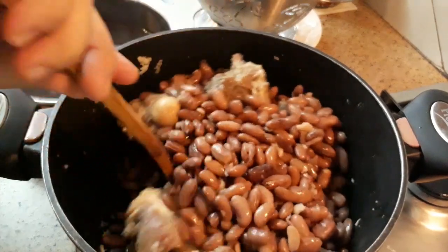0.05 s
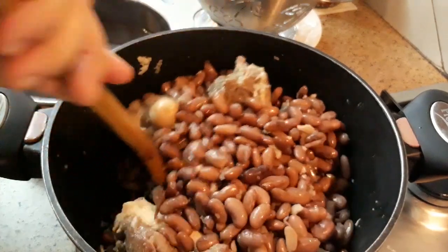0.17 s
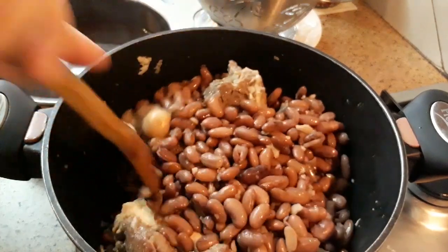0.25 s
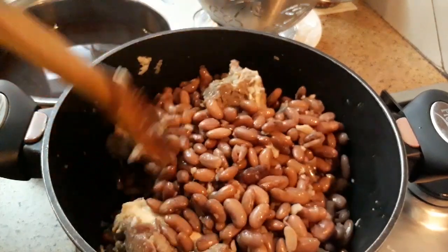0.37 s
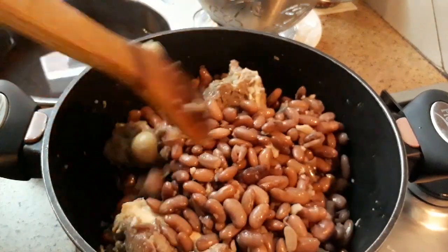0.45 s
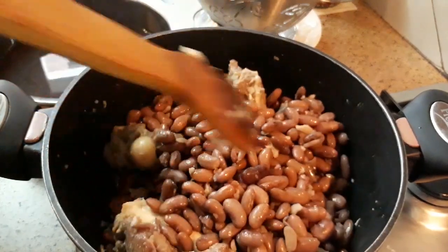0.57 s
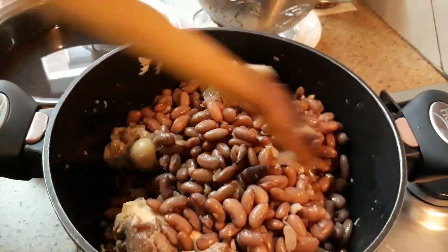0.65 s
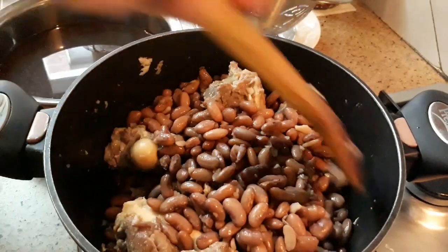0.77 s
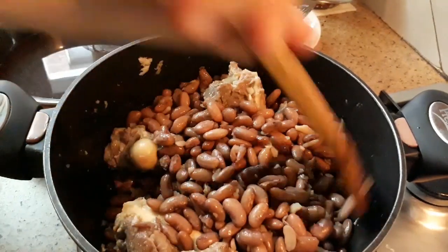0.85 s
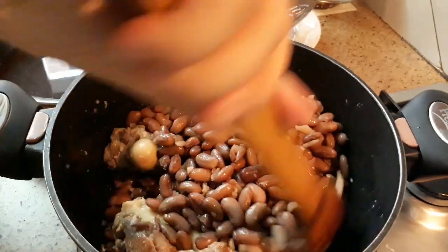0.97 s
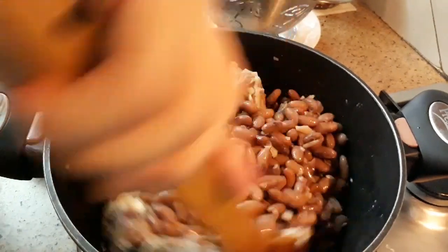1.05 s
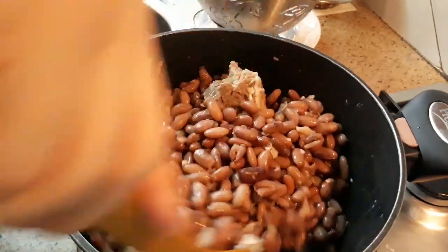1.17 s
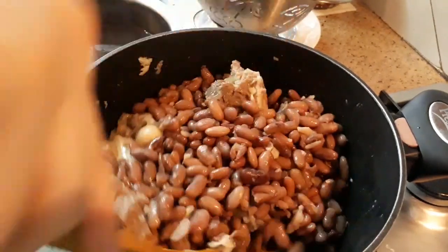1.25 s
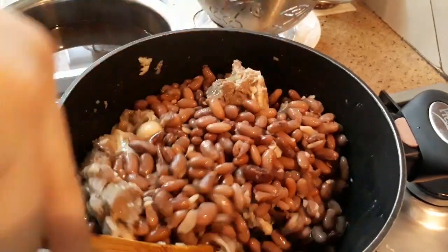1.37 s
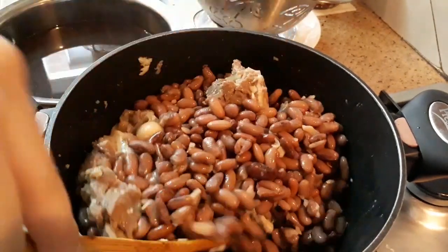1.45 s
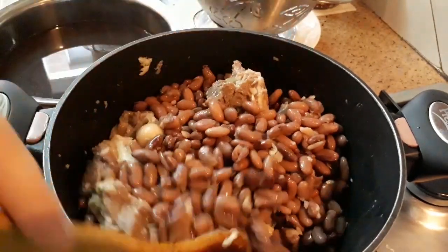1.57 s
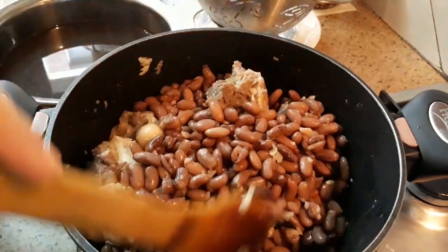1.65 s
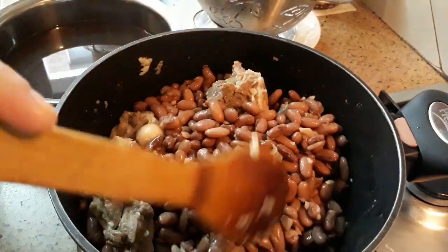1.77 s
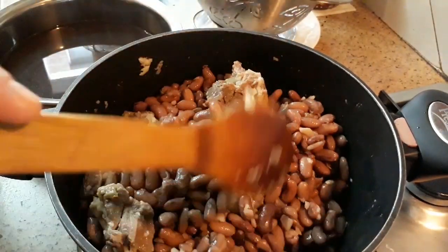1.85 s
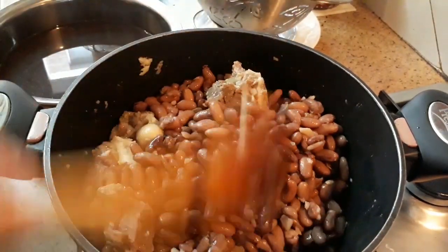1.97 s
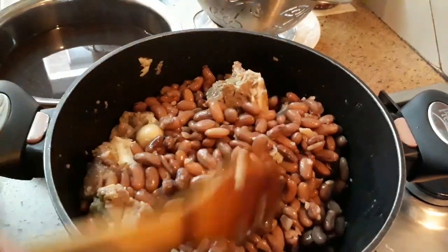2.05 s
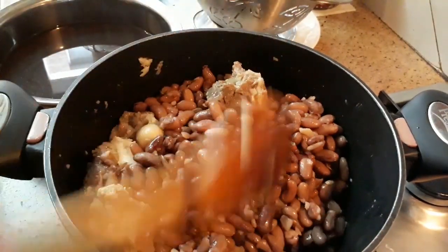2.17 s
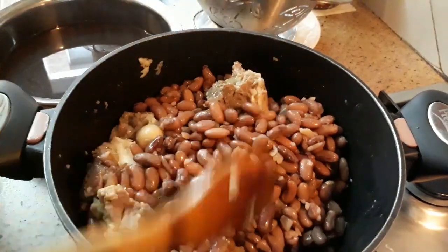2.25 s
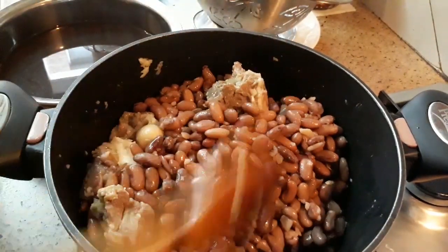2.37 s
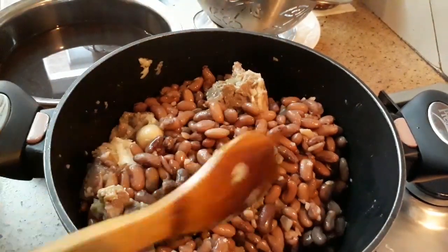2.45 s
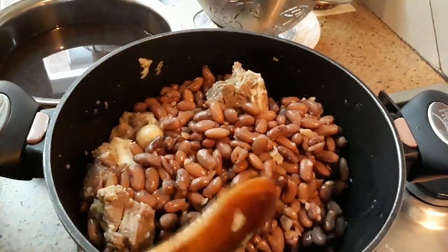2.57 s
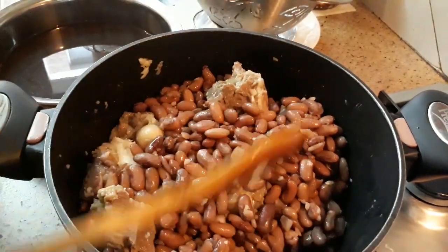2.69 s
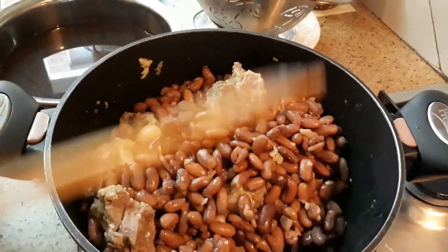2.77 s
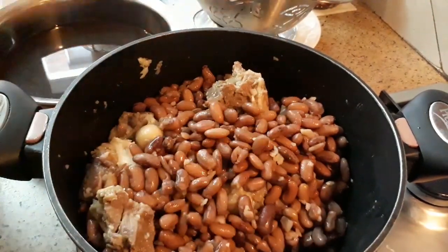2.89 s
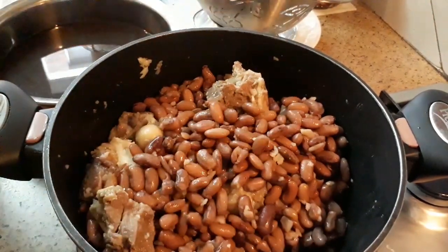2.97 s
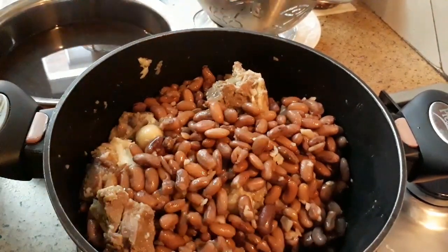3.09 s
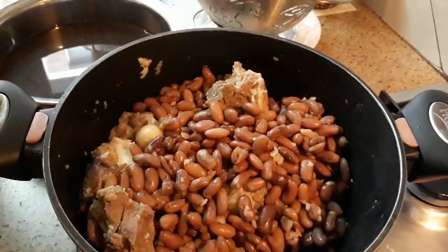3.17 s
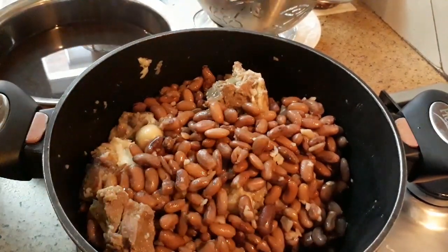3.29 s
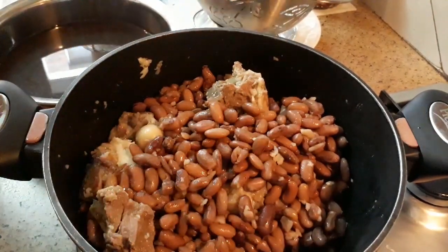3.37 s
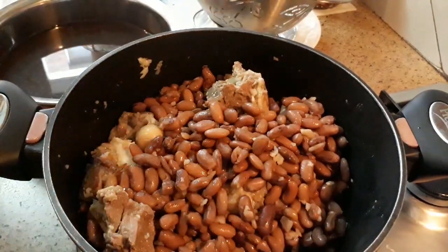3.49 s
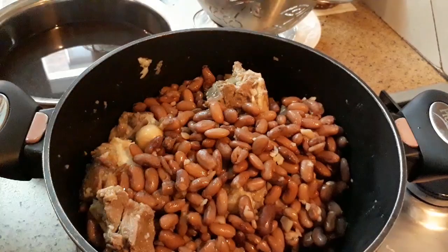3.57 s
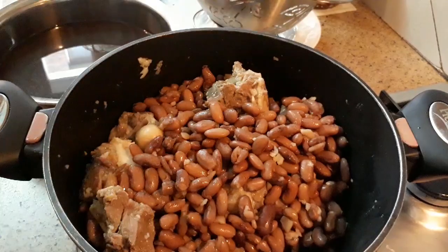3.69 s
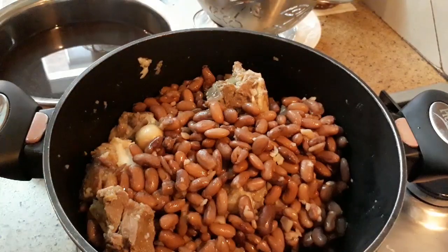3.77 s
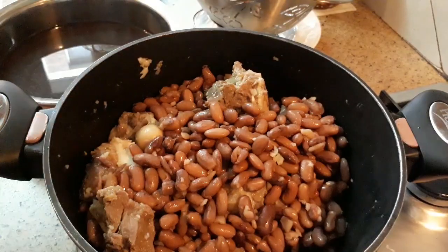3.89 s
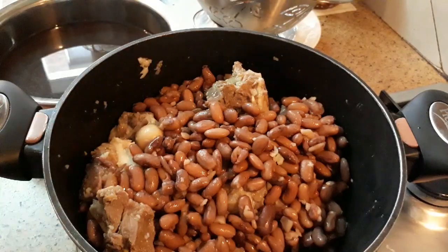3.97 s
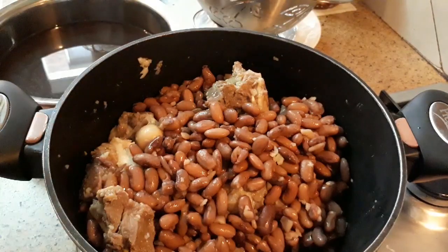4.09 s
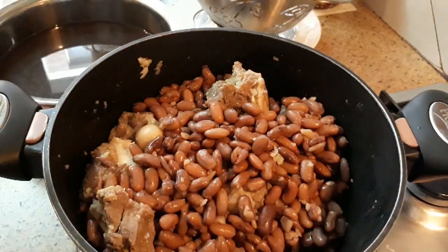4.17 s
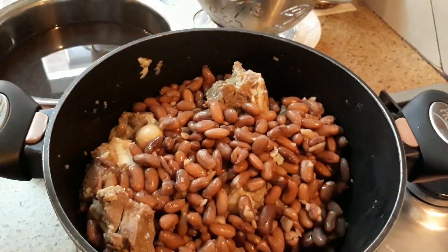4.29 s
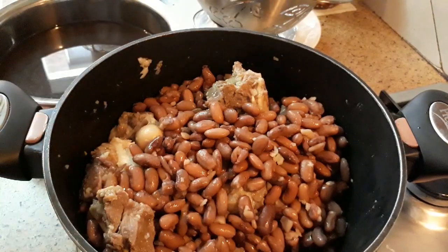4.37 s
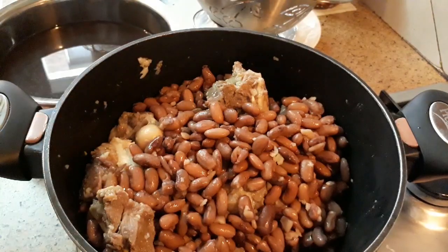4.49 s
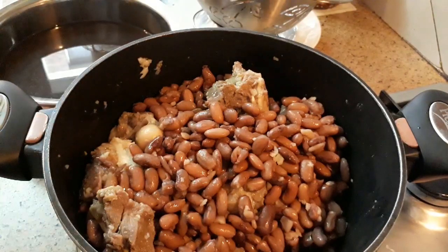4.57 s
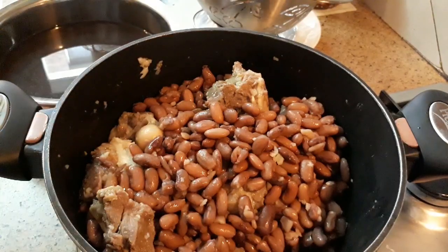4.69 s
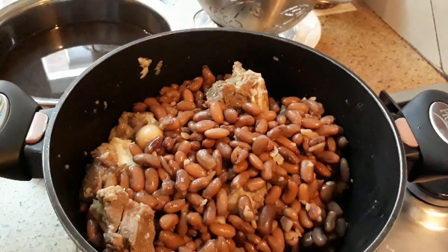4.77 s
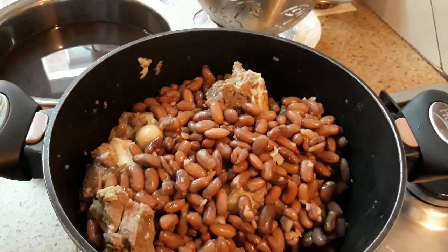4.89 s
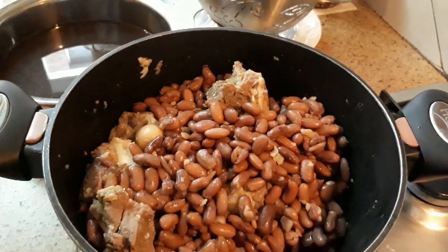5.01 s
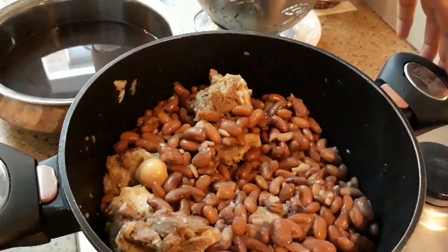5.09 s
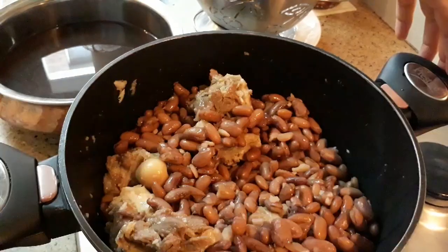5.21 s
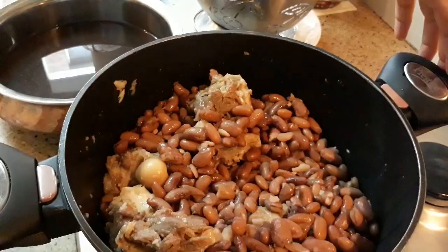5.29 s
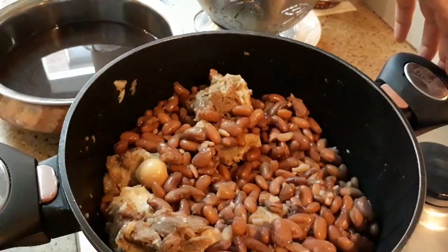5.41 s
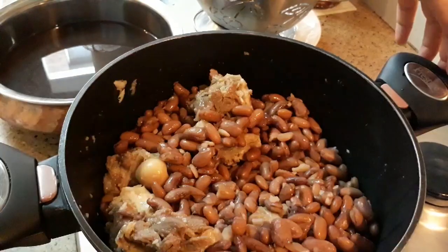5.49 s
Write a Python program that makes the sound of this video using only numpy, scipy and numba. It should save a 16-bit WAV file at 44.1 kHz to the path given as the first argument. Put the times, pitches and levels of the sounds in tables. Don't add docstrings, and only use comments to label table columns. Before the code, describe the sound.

Close in a deep metal pot, beans and meat fry with a dense, hollow-ringing crackle over a low simmering rumble. Steam plops and droplets spit. Just after two seconds a wooden spoon raps the rim four times, the last softest, with a brief kitchen echo. Sizzling continues, and a small shake near the end brings sliding food and sharper snaps. Single nearby phone microphone, mono.

```python
import sys
import numpy as np
from scipy import signal
from scipy.fft import rfft, irfft
from scipy.io import wavfile
from scipy.ndimage import uniform_filter1d
from numba import njit

SR = 44100
rng = np.random.default_rng(int(sys.argv[2]) if len(sys.argv) > 2 else 0)


def generate_wav(sig):
    pcm = np.round(np.clip(np.atleast_2d(sig).T, -1, 1) * 32767).astype(np.int16)
    wavfile.write(sys.argv[1], SR, pcm)


def voltage_ratio(level):
    return 10 ** (np.asarray(level, float) / 20)


N = 244314
T = np.arange(N) / SR

# time in seconds, vigour in dB, brightness in dB.
FRYING_COURSE = [(0.0, -27.5, 0.5), (0.69, -30.5, -1.5), (1.42, -30, 1), (1.85, -31.5, 0.5),
                 (2.33, -34.5, 2), (2.62, -36.5, -0.5), (2.92, -36, -0.5), (3.47, -33, 1.5),
                 (3.93, -32.5, 0.5), (5.18, -32.5, -1), (5.32, -32.5, 2), (5.54, -30, -1.5)]
# centre in Hz, width in Hz, level in dB.
POT_AIR = [(1630, 234, -0.5), (1923, 255, -10.5), (3260, 400, -6.5), (3714, 245, -11.5), (4160, 290, -14),
           (4650, 450, -14.5), (5225, 270, -13.5), (6150, 740, -9), (6880, 620, -10.5), (8520, 690, -8),
           (9090, 410, -4.5), (9950, 180, -5.5), (10580, 1200, -10)]
# frequency in Hz, density in dB per Hz.
CRACKLE_COLOUR = [(500, -24.5), (1000, -7), (1300, -10.5), (2500, -16.5), (4500, -29), (7500, -13.5),
                  (10500, -14), (12500, -10), (15800, -13)]
# frequency in Hz, density in dB per Hz.
RUMBLE_COLOUR = [(18, -44), (30, -11), (43, -16), (92, 1.5), (139, 3), (360, -4.5), (579, 2), (650, -24.5),
                 (840, 4.5), (1430, -120)]
# centre in seconds, half length in seconds, change in dB.
HEAVES = [
    (1.55, 0.14, 2),
    (2.1, .03, -6),
    (2.26, 0.092, 11.5),
    (2.697, .06, 7),
    (2.88, 0.075, -4),
    (4.29, 0.12, 4.5),
    (5.5, .2, 3),
]
# start in seconds, peak in dB.
PLOPS = [(0.02, -30), (0.203, -29), (0.368, -31), (0.536, -29.5), (0.728, -34), (0.897, -27), (1.077, -31),
         (1.243, -29), (1.537, -31), (1.707, -31), (1.872, -29), (2.789, -44), (2.909, -39), (3.053, -39),
         (3.197, -33), (3.32, -37), (3.523, -31), (3.917, -33), (4.044, -36), (4.207, -28), (4.291, -38),
         (4.442, -33), (4.557, -32), (4.686, -33), (4.804, -34), (4.927, -32), (5.09, -29), (5.21, -33),
         (5.328, -32), (5.429, -35)]
# start in seconds, peak in dB, pitch in Hz.
SPITS = [(0.2224, -18, 8800), (0.7048, -24, 9090), (0.8111, -34, 9100), (1.0859, -23, 9100),
         (1.5389, -21, 9150), (1.5793, -21, 9500), (1.8845, -20, 9100), (2.0981, -15.5, 9100),
         (2.2912, -18, 8300), (2.469, -16.5, 9100), (2.4947, -20, 9080), (2.9592, -29, 8800),
         (3.0654, -27, 8980), (3.7534, -31, 9040), (4.0413, -23, 9000), (4.1729, -28, 9010),
         (4.4982, -27, 8680), (4.5855, -27, 8800), (4.7391, -28, 8620), (4.7646, -26, 8600),
         (4.8304, -32, 8540), (4.919, -26, 9050), (5.1567, -22, 8410), (5.4625, -23, 8330)]
# start in seconds, peak in dB, pitch in Hz.
SNAPS = [(1.1533, -29, 3150), (1.1913, -15, 3240), (1.3674, -17, 3290), (2.86, -23, 3360),
         (3.2124, -27, 3260), (4.9182, -18.5, 4070), (5.425, -18, 3040), (5.442, -14, 3140),
         (5.4974, -17, 3400), (5.5194, -16, 3220)]
# start in seconds, peak in dB, pitch in Hz.
TICKS = [(0.1046, -30, 12500), (0.2224, -32, 12500), (2.089, -32, 12500), (2.2904, -32, 12500),
         (2.4673, -36, 12500), (2.9587, -36, 12500), (4.0407, -32.5, 12500), (4.4974, -33, 12500)]
# centre in seconds, half length in seconds, resonance in Hz, width in Hz, level in dB.
SHIFTS = [
    (1.605, 0.06, 790, 150, -34),
    (2.8, 0.12, 140, 50, -53.5),
    (4.26, 0.17, 129, 50, -46.5),
    (5.179, .03, 6100, 1400, -39),
    (5.217, 0.039, 1630, 160, -33),
    (5.377, 0.029, 1630, 160, -35),
    (5.446, 0.031, 3100, 350, -36.5),
    (5.509, 0.016, 3430, 500, -36),
]
# start in seconds, peak in dB, brightness in dB, low thud in dB.
KNOCKS = [
    (2.087, 2, -11, 0.5),
    (2.2836, 1, -10.5, -0.5),
    (2.4665, -1.5, -10, 1.5),
    (2.6480, -9, -18.5, 1.5),
]
# frequency in Hz, level in dB, 60 dB decay in seconds.
RIM_MODES = [(106, -27, 0.73), (151.9, -24.5, 0.69), (237.4, -6.5, 0.12), (298, -16.5, 0.14), (364, -13, 0.12),
             (482.5, -18, 0.27), (526, -25.5, .08), (664, -3, 0.09), (735, 3, 0.12), (790, -15, .025),
             (830, -11, 0.26), (868, -8, 0.34), (920, -21, 0.027),
             (1157, 0, 0.035), (1595, -5, 0.094), (1680, -16, 0.048), (1920, -4.5, 0.027), (2040, -10, 0.032),
        (3170, -15, 0.063), (4810, -16.5, 0.037)]
# frequency in Hz, density in dB per Hz.
RATTLE_COLOUR = [(1500, -2.5), (2500, 3), (3500, 6), (4600, 1), (6000, -3.5), (9000, -9), (12000, -13),
                 (15800, -30)]
# frequency in Hz, density in dB per Hz.
KITCHEN_COLOUR = [(60, -34), (130, -12), (250, -10), (420, -10.5), (560, -7), (760, -1), (950, -4.5),
                  (1250, -20), (1700, -10), (2100, -20), (2500, -37), (4000, -41)]
# frequency in Hz, gain in dB.
MICROPHONE = [(25, -6), (60, -0.15), (3800, 0.5), (3960, -3.5), (4120, 1.5), (11300, 0), (11900, -6.5),
              (15620, -9), (15720, -70)]


def level(x, db):
    return x * voltage_ratio(db) / np.sqrt(np.mean(x ** 2))


def colour(x, points):
    hz, db = np.transpose(points)
    f = np.fft.rfftfreq(len(x), 1 / SR) + 1
    return irfft(rfft(x) * voltage_ratio(np.interp(np.log(f), np.log(hz), db)), len(x))


def band(x, low_hz, high_hz):
    return signal.sosfilt(signal.butter(3, [low_hz, high_hz], "band", fs=SR, output="sos"), x)


@njit
def resonance(x, hz, width):
    y, band_state, low_state = np.empty(len(x)), 0., 0.
    for i in range(len(x)):
        g, damping = np.tan(np.pi * hz[i] / SR), width / hz[i]
        v = (band_state + g * (x[i] - low_state)) / (1 + g * (g + damping))
        band_state = 2 * v - band_state
        low_state = low_state + 2 * g * v
        y[i] = damping * v
    return y


def walk(rate):
    hold = int(SR / rate)
    steps = np.repeat(rng.standard_normal(N // hold + 1), hold)
    return 0.73 * uniform_filter1d(uniform_filter1d(steps, hold), hold)[:N]


def add(out, s, x):
    i = int(s * SR)
    out[i:i + len(x)] += x[:N - i]


def layer_db(offset_db, vigour_share, bright_share):
    usual_db, duck_depth_db, recover_s = -33, 0.17, 0.55
    s, vigour_db, bright_db = np.transpose(FRYING_COURSE)
    duck_db = 0
    for at, knock_db, *_ in KNOCKS:
        recovery = (T > at) * np.exp(-np.abs(T - at) / recover_s)
        duck_db = duck_db + duck_depth_db * voltage_ratio(knock_db) * recovery
    vigour_change_db = np.interp(T, s, vigour_db) - usual_db
    return (usual_db + offset_db + vigour_share * vigour_change_db
            + bright_share * np.interp(T, s, bright_db) - duck_db)


def crackle(rate, spread_db):
    chance = rng.random((3, N))
    size_db = spread_db * np.minimum(-np.log(1 - chance[1]), 5.5)
    clicks = voltage_ratio(size_db) * np.sign(chance[2] - 0.5)
    return level((chance[0] < rate / SR) * clicks, 0)


def frying():
    shake_s, rise_hz, sag_s, open_db, damp_db = 5.16, 80, 0.24, 2, 0.5
    shaken = np.clip((T - shake_s) / 0.029, 0, 1)
    hollow_db = layer_db(-3.5, vigour_share=0.75, bright_share=-0.3) - damp_db * shaken
    second_db = layer_db(-4.5, vigour_share=0.88, bright_share=-0.6) + open_db * shaken
    middle_db = layer_db(-3, vigour_share=0.72, bright_share=0.7)
    high_db = layer_db(-5.5, vigour_share=0.99, bright_share=0.6)
    surge_db = 1.2 * walk(18)

    hollow_hz = 788 + rise_hz * shaken * np.exp(-np.abs(T - shake_s) / sag_s)
    clicks = crackle(5000, 2.0) * voltage_ratio(surge_db + 1.04 * walk(11))
    hollow = resonance(resonance(clicks, hollow_hz * 0.905, 85.0), hollow_hz * 1.1, 138.0)

    sizzle = colour(crackle(10000, 3.0) * voltage_ratio(surge_db + 0.66 * walk(35)), CRACKLE_COLOUR)
    for hz, width, db in POT_AIR:
        clicks = crackle(6000, 2.9) * voltage_ratio(surge_db + db + 0.81 * walk(27.98))
        centre = hz * (1 + 0.016 * walk(7) + 0.0063 * shaken)
        stage = resonance(clicks, centre, 1.39 * width)
        sizzle = sizzle + resonance(stage, centre, 1.39 * width)

    second = level(band(sizzle, 300, 2500), second_db)
    middle = level(band(sizzle, 2500, 4800), middle_db)
    high = level(band(sizzle, 4800, 19000) * voltage_ratio(0.7 * walk(30)), high_db)
    return level(hollow, hollow_db) + second + middle + high


def simmer():
    heave_db = sum(db * np.exp(-0.5 * ((T - s) / half_s) ** 2) for s, half_s, db in HEAVES)
    rumble = colour(rng.standard_normal(N), RUMBLE_COLOUR) * voltage_ratio(1.6 * walk(7.22))
    return level(rumble, layer_db(-15, vigour_share=0.55, bright_share=0.1) + heave_db)


def steam_vent():
    t = np.arange(2600) / SR

    def burst(at, wide):
        u = (t - at) / wide
        return u * np.exp(0.5 - 0.5 * u ** 2)

    heave = np.sin(2 * np.pi * 125 * t) * (t / 0.014) * np.exp(1 - t / 0.01)
    plop = burst(0.00732, 0.00048) + 0.61 * burst(0.01542, 0.00094) + 0.18 * heave
    out = np.zeros(N)
    for s, db in PLOPS:
        add(out, s, voltage_ratio(db - 1.5) * plop)
    return out


def droplets(table, ring_s, hiss_gain):
    t, out = np.arange(700) / SR, np.zeros(N)
    for s, db, hz in table:
        noise = rng.standard_normal(len(t))
        ring = np.sin(2 * np.pi * hz * t)
        hiss = hiss_gain * resonance(noise, hz + 0 * t, 1.5 * hz)
        wisp = voltage_ratio(-16) * np.diff(noise, prepend=0)
        add(out, s, voltage_ratio(db - 8.5) * np.exp(-t / ring_s) * (ring + hiss + wisp))
    return out


def shifting_food():
    out, t = np.zeros(N), np.arange(-SR // 2, SR // 2) / SR
    for s, half_s, hz, width, db in SHIFTS:
        rustle = resonance(rng.standard_normal(len(t)), hz + 0 * t, width + 0.)
        add(out, s + t[0], level(rustle, db) * np.exp(-0.5 * (t / half_s) ** 2))
    return out


def struck_modes(t, bright_db, thud_db):
    ring = np.zeros(len(t))
    for k, (hz, db, t60) in enumerate(RIM_MODES):
        db_chance, hz_chance = rng.standard_normal(2)
        mode_db = db + 1.6 * db_chance + thud_db * (hz < 600) + (bright_db + 9.5) * (hz > 1000)
        tone = np.sin(2 * np.pi * hz * (1 + 0.0084 * hz_chance) * t)
        build = 1 - np.exp(-t * hz ** 2 / 380)
        ring += (-1) ** k * voltage_ratio(mode_db) * tone * voltage_ratio(-60 * t / t60) * build
    return ring


def kitchen_answer(t, bright_db, thud_db):
    t60_s = 0.34
    contact = [(550, thud_db), (640, -0.5), (720, 3.0), (900, -0.5), (990, -1), (1200, bright_db + 9)]
    echo = colour(colour(rng.standard_normal(len(t)), KITCHEN_COLOUR), contact)
    echo_db = 2.5 + 0.17 * (bright_db + 9.5)
    return level(echo, echo_db - 3) * np.clip(t / 0.017, 0, 1) * voltage_ratio(-60 * t / t60_s)


def spoon():
    t, out = np.arange(SR // 2) / SR, np.zeros(N)
    for s, db, bright_db, thud_db in KNOCKS:
        ring = struck_modes(t, bright_db, thud_db)
        grit = rng.standard_normal(len(t))
        crack = voltage_ratio(-27 + bright_db + 11) * np.diff(grit, prepend=0) * np.exp(-t / 0.003)
        rattle_db = bright_db + 11.5
        rattle = level(colour(grit, RATTLE_COLOUR), rattle_db - 15)
        rattle = rattle * (1 - np.exp(-t / 0.012)) * np.exp(-t / 0.052)
        echo = kitchen_answer(t, bright_db, thud_db)
        add(out, s, voltage_ratio(db - 8.5) * (crack + ring + rattle + echo))
    return out


def scene():
    pot = frying() + simmer() + steam_vent()
    ticks = voltage_ratio(8) * droplets(TICKS, ring_s=0.003, hiss_gain=2.7)
    spits = droplets(SPITS, ring_s=0.0023, hiss_gain=1.3)
    snaps = droplets(SNAPS, ring_s=0.004, hiss_gain=1.1)
    return (pot + ticks + spits + snaps + shifting_food() + spoon())[None]


def low_pass(x):
    return signal.sosfilt(signal.butter(12, 15940, fs=SR, output="sos"), x)


def record(dry):
    rounded = np.tanh(dry[0] + 0.15 * dry[0] ** 3)
    return low_pass(colour(rounded, MICROPHONE)[None])


dry = scene()
out = record(dry)
generate_wav(out)
```